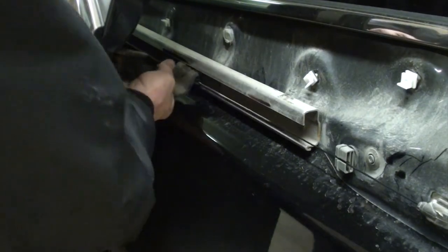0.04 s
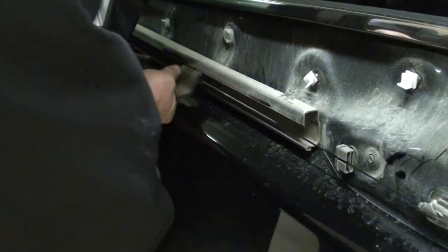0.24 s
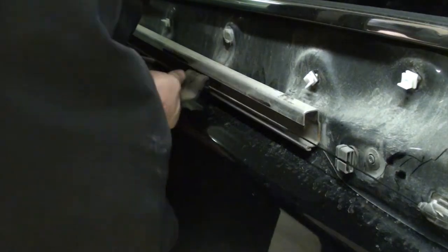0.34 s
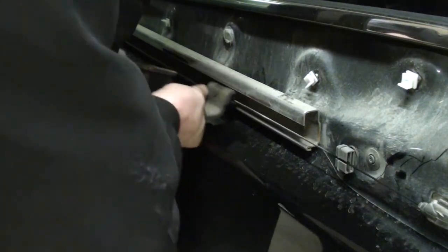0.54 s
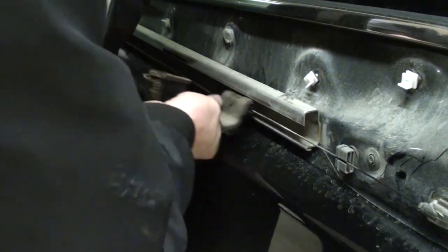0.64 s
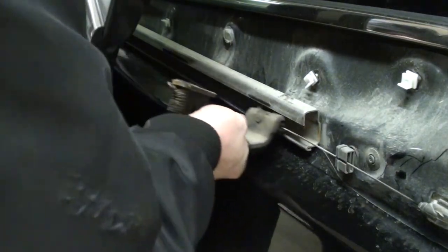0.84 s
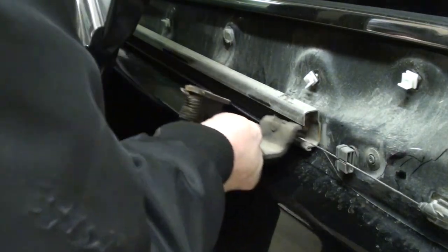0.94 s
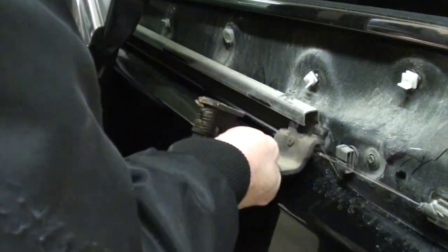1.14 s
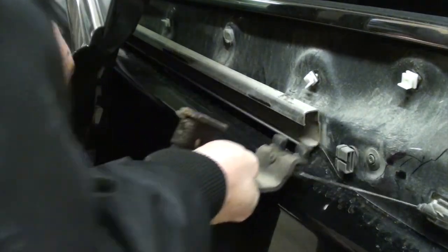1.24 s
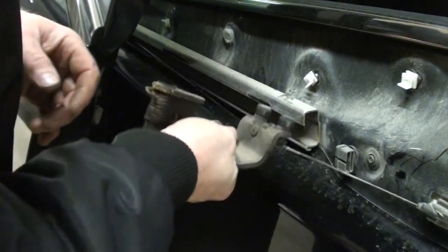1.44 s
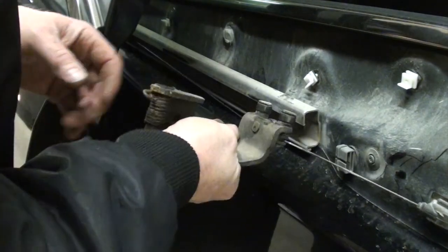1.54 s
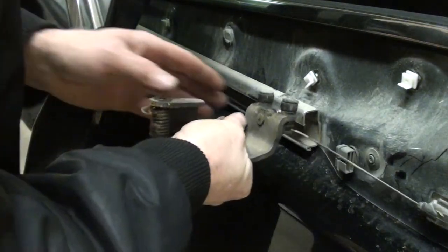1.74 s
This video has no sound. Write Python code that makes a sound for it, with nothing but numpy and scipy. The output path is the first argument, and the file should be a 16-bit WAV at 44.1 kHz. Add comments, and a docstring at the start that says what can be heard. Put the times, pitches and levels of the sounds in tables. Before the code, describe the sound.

Close by in a humming workshop, a door roller knocks onto a steel track and rolls with a gritty scrape and low rumble. The loose hinge clacks sharply, then leaves the track with a final knock and short echo.

```python
"""A door's hinge roller is pushed by hand along a steel track on the side of a van.
After a soft scuff, its wheels grind over grit: the track hisses and rings, and the body panel rumbles.
The loose hinge clacks on the way and knocks as it leaves the track's end.
A steady workshop hum lies behind, and nearby walls add a short echo."""
import sys
import numpy as np
from scipy import signal
from scipy.fft import rfft, irfft, next_fast_len
from scipy.io import wavfile
from scipy.ndimage import uniform_filter1d, map_coordinates

SR = 44100
rng = np.random.default_rng(int(sys.argv[2]) if len(sys.argv) > 2 else 0)


def to_wav(s):
    """Save 16-bit WAV."""
    ch = np.atleast_2d(s).T  # columns
    pcm = np.round(np.clip(ch, -1, 1) * 32767)  # PCM
    wavfile.write(sys.argv[1], SR, pcm.astype(np.int16))


N = 79380
TIME = np.arange(N) / SR
FADE = np.log(1000)  # a "fade time" is how long a sound takes to drop by 60 dB


def gain(db):
    """Turn decibels into a multiplier."""
    return 10 ** (np.asarray(db) / 20)


def unit(x):
    """Scale a sound to an average (rms) level of 1."""
    return x / np.sqrt(np.mean(x ** 2) + 1e-20)


def value_at(curve, hz):
    """Read between the rows of a table of frequencies and values."""
    freqs, values = np.transpose(curve)
    return np.interp(np.log(hz + 1), np.log(freqs + 1), values)


def wobble(per_second):
    """A smooth curve through so many random values a second."""
    return map_coordinates(rng.standard_normal(1024), [TIME * per_second], mode="wrap")


def filtered(x, response):
    """Multiply each frequency f in a sound by response(f)."""
    size = next_fast_len(N + SR // 2)
    return irfft(rfft(x, size) * response(np.fft.rfftfreq(size, 1 / SR)), size)[..., :N]


def coloured(x, tone):
    """Shape a sound's bass and treble with a tone table; the result has level 1."""
    return unit(filtered(x, lambda f: gain(value_at(tone, f))))


def resonated(x, peaks):
    """Make a sound ring at each peak, given as pitch in Hz, width in Hz and level in dB."""
    def response(f):
        return sum((-1) ** k * gain(db) * 1j * f * width / (hz * hz - f * f + 1j * f * width)
                   for k, (hz, width, db) in enumerate(peaks))
    return unit(filtered(x, response))


# The tone of the workshop's air noise. Each row: frequency in Hz, relative level in dB.
AIR_TONE = [(15, -77), (25, -55), (55, -21), (78, -22), (92, -31), (123, -6), (206, -11.5), (242, -2.5),
            (293, -9.5), (335, -1), (373, -8.5), (503, -8), (988, -12), (7310, -31), (16000, -51.5)]
# The notes of the machine hum. Each row: pitch in Hz, level in dB.
HUM_NOTES = [(66, -48), (133, -44), (334, -43)]

def workshop():
    """Steady air noise with a machine hum that wavers in pitch and loudness."""
    hum = np.zeros(N)
    for hz, db in HUM_NOTES:
        note = np.sin(2 * np.pi * hz * TIME + 0.91 * wobble(per_second=7.8))
        hum += gain(db) * unit(note * gain(1.6 * wobble(per_second=6.25)))
    return gain(-28.5) * coloured(rng.standard_normal(N), AIR_TONE) + hum


def grit(hits_per_second=5000, scatter_db=3.5):
    """Grains under the wheels make tiny clicks of random strength at random times."""
    hits = rng.random(N) < hits_per_second / SR
    return hits * np.sign(rng.standard_normal(N)) * gain(scatter_db * rng.standard_normal(N))


# The tone of the scuff. Each row: frequency in Hz, relative level in dB.
SCUFF_TONE = [(50, -18), (130, 3.5), (330, -2.5), (600, 0), (1200, -21), (3000, -17.5), (5000, -28),
              (7300, -21.5), (10000, -34.5), (16000, -40)]

def hinge_scuff(start_s=0.196, rise_s=0.023, fade_s=0.13, level_db=-19):
    """The hinge shifts in the hand and softly scuffs the track before it rolls."""
    rise = np.clip((TIME - start_s) / rise_s, 0, 1)
    fall = np.exp(-FADE * np.maximum(TIME - start_s - rise_s, 0) / fade_s)
    return gain(level_db) * rise * fall * coloured(grit(), SCUFF_TONE)


# The body panel's own notes. Each row: pitch in Hz, relative level in dB, fade time in seconds.
PANEL_NOTES = [(130.2, -8.5, 0.59), (164.4, -3, 0.22), (222.3, -3, 0.12), (276.8, -2.5, 0.19),
               (307.2, -3, 0.17), (336.5, -10, 0.15), (394.1, -2, 0.22), (431.4, -0.5, .15),
               (574, -3.5, 0.13), (758, -5.5, 0.19), (1051, -12.5, 0.11)]
# The tone of the rumble. Each row: frequency in Hz, relative level in dB.
RUMBLE_TONE = [(40, -47), (95, -27), (150, -14), (220, -3), (330, -6), (460, -8.5), (650, -14.5),
               (1200, -54), (3000, -51)]

def panel_rumble():
    """Grit shakes the body panel, which rumbles and rings at its own low notes."""
    peaks = [(hz, FADE / np.pi / fade_s, db) for hz, db, fade_s in PANEL_NOTES]
    return unit(coloured(grit(), RUMBLE_TONE) + gain(1) * resonated(grit(), peaks))


def travelling(x, depth_db, width_hz=90, life_s=0.08):
    """Narrow bands swell and fade at random, as when wheels pass the still spots of a ringing track."""
    hz, times, spectrum = signal.stft(x, SR, nperseg=1024)
    swell = rng.standard_normal(spectrum.shape)
    for axis, size in enumerate([width_hz / hz[1], life_s / times[1]]):
        swell = uniform_filter1d(swell, max(1, round(size)), axis)
    spectrum = spectrum * gain(depth_db * unit(swell))
    return unit(signal.istft(spectrum, SR, nperseg=1024)[1][:N])


# The tone of the grinding. Each row: frequency in Hz, relative level in dB.
GRIND_TONE = [(300, -22), (550, 4.5), (800, 1), (1050, 2), (1300, -4), (1600, -8.5), (2100, -8.5),
              (3000, -42), (6000, -53)]

def wheel_grind():
    """The wheels grind over grit with a rough, middle-pitched noise."""
    return travelling(coloured(grit(), GRIND_TONE), depth_db=2.2)


# The tone of the steel's hiss. Each row: frequency in Hz, relative level in dB.
HISS_TONE = [(900, -40), (2000, -9), (3100, 1), (4200, 0), (5400, -2.5), (7500, -3), (8400, -6),
             (10500, -13.5), (13000, -14.5), (16000, -35)]
# The track's own notes. Each row: pitch in Hz, width in Hz, relative level in dB.
TRACK_NOTES = [(1877, 60, -3.5), (2250, 55, 0), (2392, 53, -0.5), (3166, 180, 3), (3870, 53, -2),
               (4450, 90, -5.5), (4940, 100, -11.5), (5580, 105, -3), (6281, 23, 5.5), (6480, 360, -4.5),
               (7580, 450, -9.5)]

def track_scrape():
    """Grit scrapes the steel track, which hisses and rings at high notes."""
    return travelling(coloured(grit(), HISS_TONE) + resonated(grit(), TRACK_NOTES), depth_db=3.1)


# The push along the track. Each row: time in seconds, then relative rumble, grind and scrape in dB.
PUSH_LEVELS = [(0.361, -29, -36, -33.5), (.43, -30, -28.5, -28.5), (.51, -24, -27.5, -28.5),
               (.615, -22.5, -32.5, -29.5), (0.666, -18, -21.5, -21.5), (.71, -23.5, -29, -24.5),
               (.74, -17.5, -23, -24), (.795, -16.5, -23.5, -28), (.845, -21, -29.5, -27.5),
               (.88, -19.5, -23, -24), (.96, -20.5, -20.5, -22.5), (1.02, -19.5, -23.5, -25),
               (1.09, -19.5, -30, -34.5), (1.135, -22.5, -31.5, -31.5), (1.175, -30.5, -39, -31.5),
               (1.24, -40, -27, -49)]

def rolling(ramp_s=0.025):
    """Rumble, grind and scrape rise and fall with the push and share an uneven judder."""
    times, *columns = np.transpose(PUSH_LEVELS)
    rumble_db, grind_db, scrape_db = [np.interp(TIME, times, column) for column in columns]
    moving = np.clip(1 + np.minimum(TIME - times[0], times[-1] - TIME) / ramp_s, 0, 1)
    judder = wobble(per_second=70)
    rumble = panel_rumble() * gain(rumble_db + 1.5 + 1.2 * judder)
    grind = wheel_grind() * gain(grind_db + 1.2 * judder)
    scrape = track_scrape() * gain(scrape_db - 0.5 + 0.7 * judder)
    return moving * (rumble + grind + scrape)


def struck(start, attack_s, fade_s):
    """The loudness of a blow: it jumps up, then dies away."""
    age = np.maximum(TIME - start, 0)
    return (1 - np.exp(-age / attack_s)) * np.exp(-FADE * age / fade_s)


# The clacks. Each row: start in seconds, relative level in dB, boosted frequency in Hz,
# fade time of the crack in seconds.
CLACK_HITS = [(0.3506, -23.5, 10300, 0.037), (0.355, -18.5, 3530, 0.048), (.8178, -13, 5600, 0.042),
              (.840, -14.5, 5460, 0.033), (1.109, -11.5, 7900, 0.042), (1.194, -13.5, 7560, 0.048),
              (1.2119, -14.5, 7200, 0.018), (1.215, -22, 4230, 0.063)]
# The tone of the crack. Each row: frequency in Hz, relative level in dB.
CRACK_TONE = [(400, -20), (1200, -4), (2200, 4), (4000, -1.5), (7500, -4), (10500, -6), (12500, -8),
              (16000, -28)]
# The hinge's own notes. Each row: pitch in Hz, relative level in dB.
HINGE_NOTES = [(2230, 0), (2950, 2.5), (3540, -5), (4550, -8), (5300, -0.5), (5600, -2), (7050, 4.5),
               (7400, 6), (7750, 1.5), (8150, -8), (9900, -5), (10600, -1.5), (11850, -8)]

def hinge_clacks(attack_s=0.0004):
    """The loose hinge hits the track, steel on steel: a bright crack and a ring the hand soon damps."""
    out = np.zeros(N)
    for start, db, boost_hz, fade_s in CLACK_HITS:
        def boost(f):
            return gain(7 * nearness(f, boost_hz, octaves=0.33))
        crack = unit(filtered(rng.standard_normal(N), lambda f: gain(value_at(CRACK_TONE, f)) * boost(f)))
        ring = np.zeros(N)
        for hz, note_db in HINGE_NOTES:
            strength = gain(note_db + rng.normal(0, 0.76)) * boost(hz)
            ring += strength * np.sin(2 * np.pi * (hz * TIME + rng.random()))
        out += gain(db - 2) * struck(start, attack_s, fade_s) * crack
        out += gain(db - 5.5) * struck(start, attack_s, 1.24 * fade_s) * unit(ring)
    return out


def nearness(hz, centre_hz, octaves):
    """A bell-shaped weight: 1 at the centre pitch, falling towards 0 on both sides."""
    return np.exp(-0.5 * (np.log2((hz + 1) / centre_hz) / octaves) ** 2)


# The knocks. Each row: start in seconds, relative level in dB, the thump's pitch in Hz,
# its fade time in seconds.
KNOCK_HITS = [(0.3524, -5.5, 317, 0.051), (.366, -18.5, 340, 0.13), (.669, -8.5, 376, .05),
              (0.8399, -7.5, 300, 0.027), (1.112, -12.5, 191, 0.12), (1.2115, -4, 175.5, 0.069),
              (1.2205, -8, 405, 0.087), (1.237, -12, 318, 0.073), (1.256, -10.5, 167, 0.032)]

def panel_knocks(attack_s=0.00096, cutoff_hz=99):
    """The roller lands with a short thump, and the panel's notes near that pitch ring on."""
    out = np.zeros(N)
    for start, db, thump_hz, fade_s in KNOCK_HITS:
        turn = 2 * np.pi * (TIME - start)
        ring = np.zeros(N)
        for hz, note_db, ring_s in PANEL_NOTES:
            strength = gain(note_db + rng.normal(0, 1)) * nearness(hz, thump_hz, octaves=0.7)
            ring += strength * np.sin(hz * turn + rng.normal(0, 1)) * struck(start, attack_s, ring_s)
        thump = np.sin(thump_hz * turn) * struck(start, attack_s, fade_s)
        out += gain(db) * (thump + gain(-6.5) * ring)
    # The knocks lose their deepest bass below the cutoff.
    return signal.sosfilt(signal.butter(2, cutoff_hz, "highpass", fs=SR, output="sos"), out)


# How long the walls echo. Each row: frequency in Hz, fade time in seconds.
ECHO_FADES = [(150, 0.58), (1000, 0.33), (8000, 0.11)]

def wall_echo(x):
    """Nearby walls send back a blur of sound whose treble dies first."""
    hz, times, noise = signal.stft(rng.standard_normal(SR // 2), SR, nperseg=256)
    decay = np.exp(-FADE * times / value_at(ECHO_FADES, hz)[:, None])
    tail = signal.istft(noise * decay, SR, nperseg=256)[1]
    return signal.fftconvolve(x, tail / np.linalg.norm(tail))[:N]


# The balance between the sides. Each row: frequency in Hz, left level minus right level in dB.
BALANCE = [(100, 1.2), (250, .3), (500, -0.5), (1400, -2.1), (4000, -1.2), (10000, 0)]
# How far the left wave runs ahead. Each row: frequency in Hz, lead in radians (negative is behind).
LEFT_LEAD = [(60, 0.011), (130, -0.13), (400, -0.4), (1000, -0.42), (2000, -0.36), (4000, -0.18), (9000, 0)]
# The echo that adds width. Each row: frequency in Hz, level in dB.
WIDTH = [(100, -33), (500, -20.5), (1500, -18), (4000, -17), (8000, -18.5), (12000, -61)]

def stereo(mono):
    """The sound reaches left and right nearly alike, with a faint echo for width."""
    side = filtered(wall_echo(mono), lambda f: gain(value_at(WIDTH, f)))
    sign = np.array([[1], [-1]])  # left, right
    def placement(f):
        return gain(sign * value_at(BALANCE, f) / 2) * np.exp(0.5j * sign * value_at(LEFT_LEAD, f))
    return filtered(mono, placement) + sign * side


def scene():
    """The roller close by, its echo and the workshop behind it."""
    roller = rolling() + hinge_clacks() + panel_knocks() + hinge_scuff()
    return stereo(roller + gain(-14) * wall_echo(roller) + workshop())


def record(dry, top_hz=15900):
    """Round off the loudest peaks and cut the very highest treble."""
    rounded = dry / (1 + np.abs(dry) ** 8) ** (1 / 8)
    return filtered(rounded, lambda f: f < top_hz)


dry = scene()
out = record(dry)
to_wav(out)
```